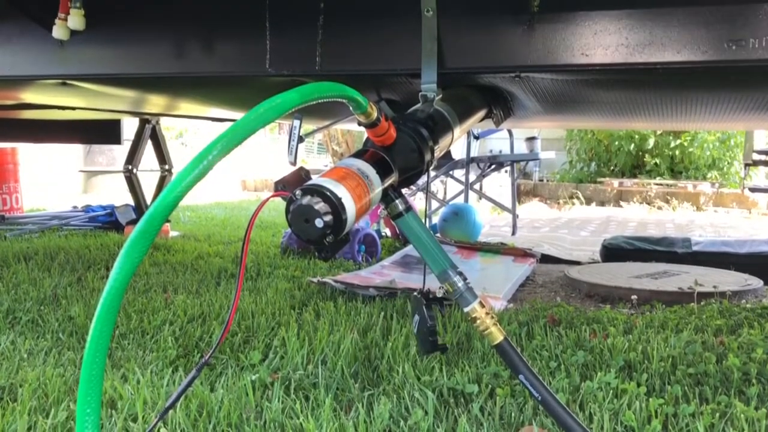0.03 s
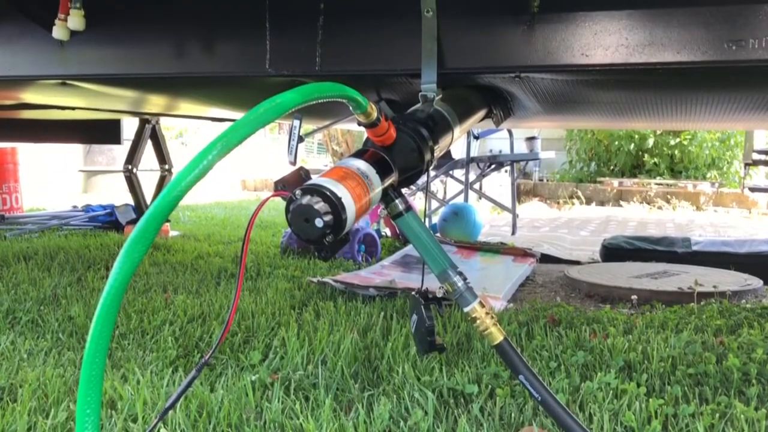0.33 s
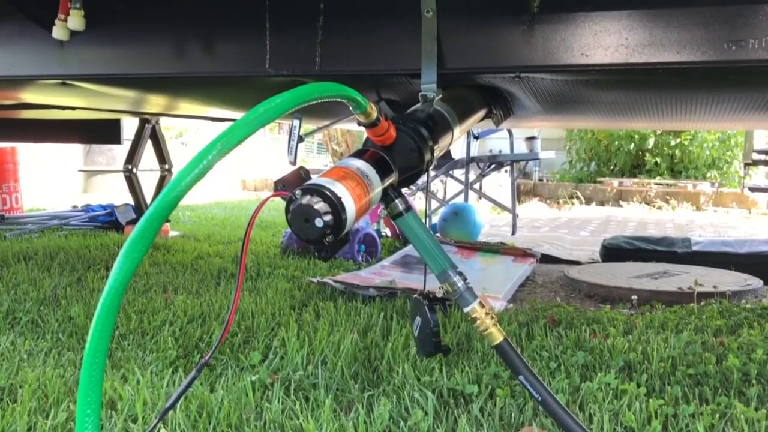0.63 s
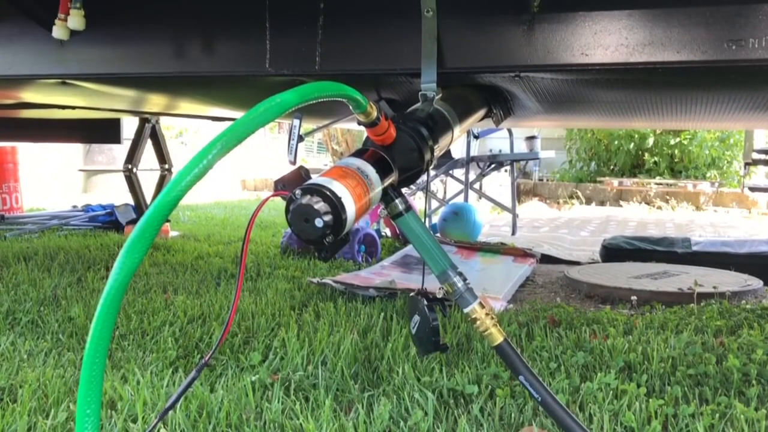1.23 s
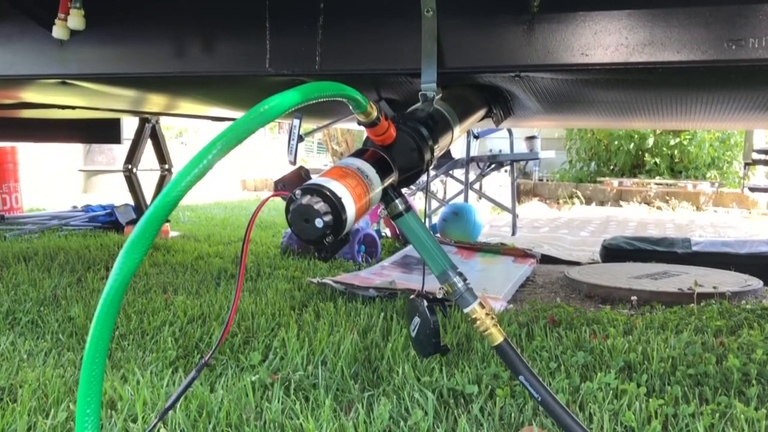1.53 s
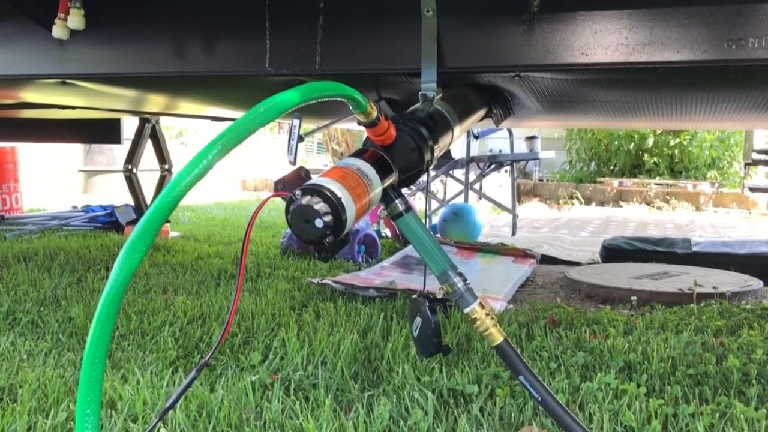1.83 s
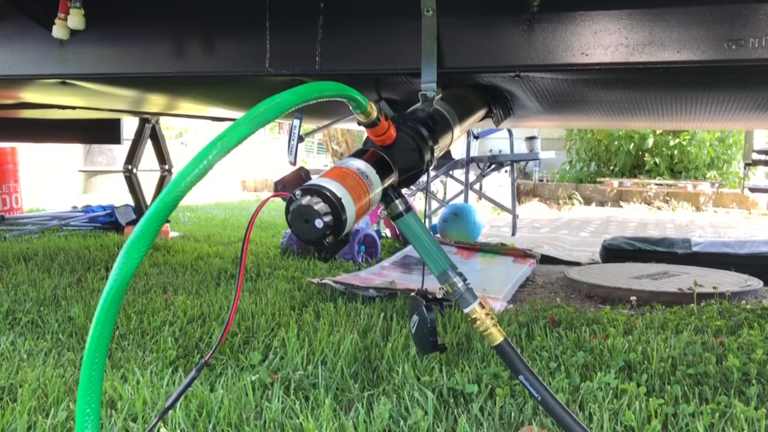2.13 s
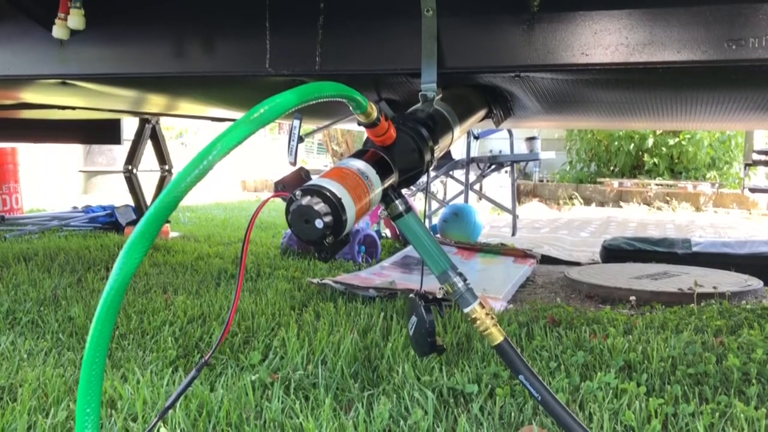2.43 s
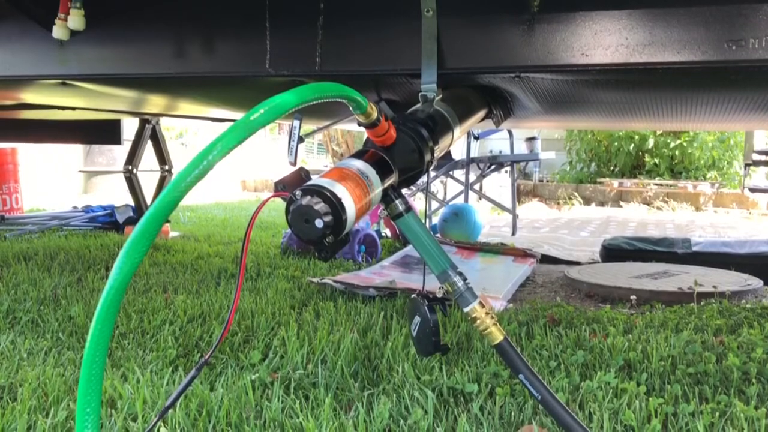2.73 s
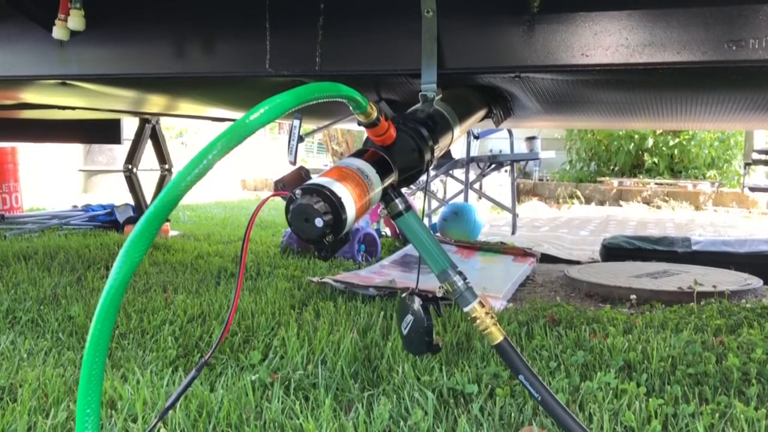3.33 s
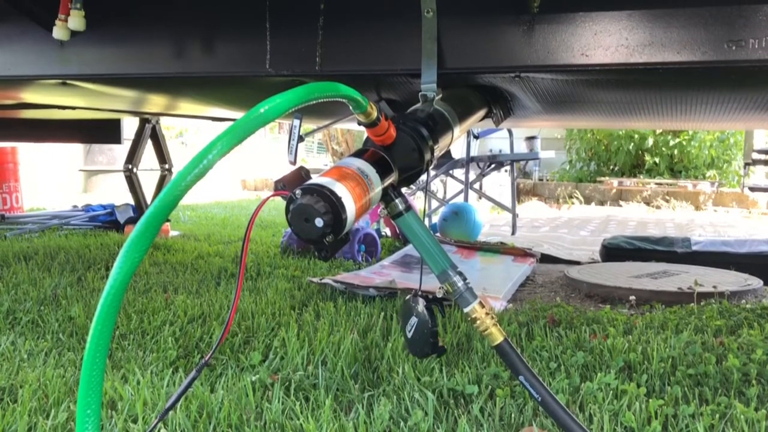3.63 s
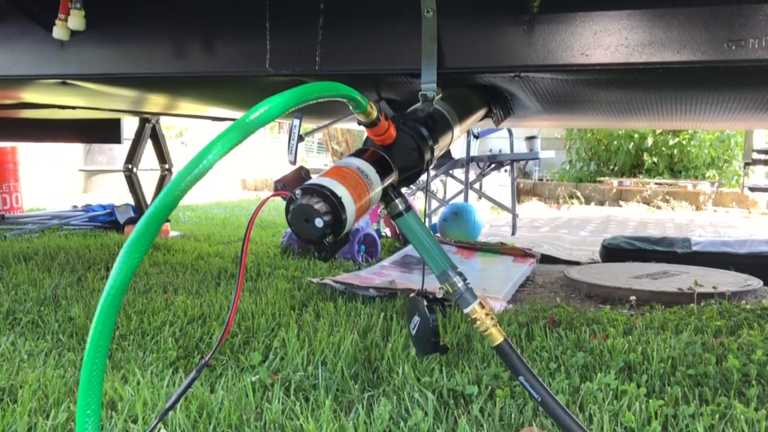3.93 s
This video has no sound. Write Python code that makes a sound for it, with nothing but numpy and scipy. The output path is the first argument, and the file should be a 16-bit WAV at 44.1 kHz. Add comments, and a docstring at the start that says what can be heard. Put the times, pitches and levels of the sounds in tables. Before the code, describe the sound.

Close up outdoors, a small electric pump hums at an even pitch, its vanes ticking rapidly while water churns in the housing. A faint rumble lies underneath, grit clicks three times, and the hum shifts slightly near the end.

```python
"""A small electric macerator pump runs steadily on a lawn, close by. From the start its six
impeller vanes hum and tick, the shaft knocks in the same pattern every turn, and water churns
through the housing and hose over a low outdoor rumble and drone. Grit clicks in the housing
near 0.8 s and 2.1 s. A soft thud at 2.7 s comes just before a last click, and around then
the load shifts and a few partials of the hum swell."""
import sys
import numpy as np
from scipy import signal
from scipy.fft import rfft, irfft, next_fast_len
from scipy.io import wavfile
from scipy.ndimage import map_coordinates

SR = 44100
rng = np.random.default_rng(int(sys.argv[2]) if len(sys.argv) > 2 else 0)


def int16_out(signal):
    """Quantize to a 16-bit WAV file."""
    q = np.round(np.clip(np.atleast_2d(signal).T, -1, 1) * 32767)
    wavfile.write(sys.argv[1], SR, q.astype(np.int16))


N = 176400

def amp(db):
    """Amplitude grows tenfold for every 20 dB."""
    return 10 ** (np.asarray(db) / 20)

def unit(x):
    """Normalisation to an rms of 1."""
    return x / np.sqrt(np.mean(x ** 2) + 1e-20)

def wobble(rate):
    """Random modulation: a smooth curve through `rate` random knots a second."""
    knots = rng.standard_normal(1024)
    return map_coordinates(knots, [np.arange(N) * rate / SR], mode="wrap")

def filtered(x, response):
    """Linear filtering multiplies the spectrum by a frequency response."""
    size = next_fast_len(N + SR // 2)
    return irfft(rfft(x, size) * response(np.fft.rfftfreq(size, 1 / SR)), size)[:N]

def coloured(x, spectrum):
    """Spectral shaping by (Hz, dB) points, falling 12 dB an octave beyond them; the rms is 1."""
    hz, db = np.transpose(spectrum)
    def response(f):
        gain = amp(np.interp(np.log(f + 1), np.log(hz), db))
        return gain * np.minimum(f / hz[0], 1) ** 2 / np.maximum(f / hz[-1], 1) ** 2
    return unit(filtered(x, response))

def ringing(force, modes):
    """Resonance: each mode passes a narrow band of the force that drives it."""
    def peak(f, hz, width):
        return (1j * f * width / (hz * hz - f * f + 1j * f * width)) ** 2
    # Squaring narrows a peak; the factor 1.55 restores its width.
    return sum(amp(db) * unit(filtered(force, lambda f: peak(f, hz, 1.55 * width)))
               for hz, width, db in modes)

def contacts(turns, pattern, decay_ms, scatter_db):
    """Impact excitation: decaying noise bursts of uneven strength at set angles of every turn."""
    angle, db = np.transpose(pattern)
    at_turn = (np.arange(180)[:, None] + angle).ravel()
    scatter = scatter_db * np.clip(rng.standard_normal(len(at_turn)), -2, 2)
    strength = amp(np.resize(db, len(at_turn)) + scatter)
    blows = np.bincount(np.searchsorted(turns, at_turn), strength, N + 1)[:N]
    envelope = signal.lfilter([1], [1, -np.exp(-1e3 / (decay_ms * SR))], blows)
    return envelope * rng.standard_normal(N)

# The shaft's speed. Each row: time in seconds, turns per second.
SHAFT_SPEED = [(0, 43.5), (.3, 43.52), (.55, 43.44), (.8, 43.52), (1.05, 43.46), (1.3, 43.52),
               (1.75, 43.43), (2.1, 43.49), (2.4, 43.56), (2.75, 43.54), (3.1, 43.6), (3.7, 43.52),
               (4, 43.52)]
def shaft_turns(t):
    """Angle, here in turns, is the integral of rotational speed."""
    return np.cumsum(np.interp(t, *np.transpose(SHAFT_SPEED))) / SR

# The knocks of one turn. Each row: angle in turns, relative level in dB.
KNOCK_PATTERN = [(0.036, -5), (.158, -1), (0.206, -6.5), (0.324, -4.5), (.38, -8.5), (0.543, -5),
                 (0.712, -6.5), (.878, 0.5), (0.918, -5), (.985, -3)]
# Their clack. Each row: frequency in Hz, relative spectral density in dB.
KNOCK_SPECTRUM = [(1800, -21), (2500, -12), (2850, -11.5), (3280, -18), (3450, 0.5), (4000, 1.5),
                  (4700, -1), (5150, -3.5), (6000, -8.5), (8000, -12), (15000, -21)]
# The casing's resonances. Each row: frequency in Hz, bandwidth in Hz, rms level in dB.
CASING_MODES = [(2652, 65, -68.5), (2843, 164, -58.5), (3435, 140, -69.5), (3900, 460, -67.5),
                (5113, 300, -72.5)]
def shaft_knocks(turns):
    """Impacts of the shaft, drifting in force, clack and excite the modes of the casing."""
    blows = contacts(turns, KNOCK_PATTERN, decay_ms=0.44, scatter_db=2) * amp(0.58 * wobble(20))
    return amp(-55.5) * coloured(blows, KNOCK_SPECTRUM) + ringing(blows, CASING_MODES)

VANES = 6
# The pump body's hum and whine. Each row: multiple of the shaft speed, level in dB re HUM_DB.
HARMONICS = [(2, -24), (3, -39), (4, -37), (5, -31), (6, -2.5), (7, -28.5), (8, -39.5), (9, -40),
             (11, -29.5), (12, -13.5), (13, -34.3), (14, -39), (15, -41.5), (16, -35), (17, -35.5),
             (18, -31.5), (19, -31.5), (20, -41), (21, -57), (22, -51), (23, -43.5), (24, -37), (25, -45.5),
             (26, -34.5), (28, -40.5), (29, -40), (30, -37), (31, -37), (32, -40.5), (33, -37.5), (34, -44),
             (35, -43.5), (36, -33), (37, -35.5), (38, -47), (39, -50), (40, -61), (41, -45.3), (42, -39.5),
             (43, -48), (44, -68), (46, -60.8), (47, -57.4), (48, -55), (49, -55), (50, -60), (51, -56),
             (54, -44), (56, -49), (57, -63), (59, -46), (60, -33.5), (61, -45), (63, -46.2), (65, -43),
             (70, -49), (71, -53), (72, -39)]
# The effect of the load shift. Each row: multiple of the shaft speed, change of level in dB.
LOAD_CHANGES = [(4, -3), (5, 7), (12, 1.8), (36, 2), (54, 3)]
HUM_DB, LOAD_SHIFT_S, LOAD_RISE_S = -29, 2.87, 0.39
def pump_hum(t, turns):
    """Periodic motion gives harmonics: the first two vane-passing tones are firm, the rest waver."""
    load = np.tanh((t - LOAD_SHIFT_S) / LOAD_RISE_S) / 2
    angle, knock_db = np.transpose(KNOCK_PATTERN)
    hum = np.zeros(N)
    for order, db in HARMONICS:
        firm = order in (VANES, 2 * VANES)
        waver_db = (0.13 if firm else 1.5) * wobble(14)
        envelope = unit(amp(waver_db + dict(LOAD_CHANGES).get(order, 0) * load))
        # The wavering harmonics take their phase from the knock pattern.
        phase = 0 if firm else np.angle(np.sum(amp(knock_db) * np.exp(-2j * np.pi * order * angle)))
        hum += amp(db) * envelope * np.sin(2 * np.pi * order * turns + phase)
    return amp(HUM_DB) * np.sqrt(2) * hum

# Each entry: relative level of one vane's tick in dB.
VANE_LEVELS = [-1, 0, .5, -1, 0, -2.5]
# The ticks and the rubbing. Each row: frequency in Hz, relative spectral density in dB.
TICK_SPECTRUM = [(3000, -17), (5500, -1), (6500, -1), (6800, 0), (7200, -1), (8200, -0.5), (9500, -5),
                 (11000, -8), (11800, -1.5), (12700, -12), (14200, -6), (14900, -5), (15700, -7)]
RUB_SPECTRUM = [(1800, -16), (2200, -7), (2800, 5.5), (3250, 3), (3900, 3.5), (5300, -2), (5900, -4.5),
                (6500, -3), (6800, -7), (7200, -7), (8300, -3.5), (9000, -13.5), (12700, -18), (14200, -4),
                (15700, -23)]
# The motor's resonances. Each row: frequency in Hz, bandwidth in Hz, rms level in dB.
MOTOR_MODES = [(7230, 200, -68), (10305, 130, -73.5), (10410, 170, -69), (14100, 250, -74)]
def impeller_vanes(turns):
    """Impact and friction: passing vanes tick over a rubbing hiss, and both ring the motor."""
    pattern = [(0.115 + k / VANES, db) for k, db in enumerate(VANE_LEVELS)]
    ticks = contacts(turns, pattern, decay_ms=0.53, scatter_db=1.7) * amp(1.4 * wobble(25.04))
    rub = rng.standard_normal(N)
    ring = ringing(unit(ticks) + amp(-7) * rub, MOTOR_MODES)
    return amp(-58) * coloured(ticks, TICK_SPECTRUM) + amp(-54.5) * coloured(rub, RUB_SPECTRUM) + ring

# The churning water. Each row: frequency in Hz, relative spectral density in dB.
WATER_SPECTRUM = [(60, 0.5), (110, -3.5), (220, 1.5), (320, -3.5), (390, -2.5), (430, -3.5), (480, 1.5),
                  (550, -10), (620, -4), (700, -1), (790, -9.5), (920, -9.5), (1050, -12), (1220, -5),
                  (1420, -14), (1620, -13.5), (1750, -15), (2100, -22.5), (3000, -28.5)]
def water():
    """Turbulence in the housing and hose makes broadband noise of nearly steady level."""
    return amp(-50 + 0.42 * wobble(29.9)) * coloured(rng.standard_normal(N), WATER_SPECTRUM)

# The outdoor rumble. Each row: frequency in Hz, relative spectral density in dB.
RUMBLE_SPECTRUM = [(20, -36), (33, -32), (44, -12), (65, -1), (90, -3), (120, -12), (300, -32)]
# The swell of rumble and drone. Each row: time in seconds, gain in dB.
BASS_ENVELOPE = [(0, -58), (.22, -50), (.39, -59), (.63, -48.5), (.77, -58), (1.0, -49), (1.2, -50),
                 (1.55, -57), (1.72, -50.5), (2.2, -54), (2.36, -62), (2.54, -53), (2.8, -58),
                 (2.94, -53.5), (3.35, -51), (3.63, -60), (3.78, -60), (3.93, -53)]
def rumble_and_drone(t, drone_hz=66.4):
    """Amplitude modulation: outdoor rumble and a wavering drone swell under one envelope."""
    rumble = amp(-4) * coloured(rng.standard_normal(N), RUMBLE_SPECTRUM)
    waver = amp(2 * wobble(2.7))
    drone = amp(-0.5) * unit(waver * np.sin(2 * np.pi * drone_hz * t + 0.6 * wobble(4.6)))
    return amp(np.interp(t, *np.transpose(BASS_ENVELOPE))) * (rumble + drone)

# Grit striking the housing. Each row: start in seconds, initial level in dB.
GRIT_HITS = [(.76, -45), (2.068, -43), (2.757, -45)]
# Its click. Each row: frequency in Hz, relative spectral density in dB.
GRIT_SPECTRUM = [(2500, -20), (3300, 2), (4200, -4), (6000, -12), (9000, -31)]
def grit(t, decay_ms=4.9):
    """Damping makes the click of each impact on the housing die away exponentially."""
    envelope = sum(amp(db) * (t >= start) * np.exp(-np.abs(t - start) * 1e3 / decay_ms)
                   for start, db in GRIT_HITS)
    return envelope * coloured(rng.standard_normal(N), GRIT_SPECTRUM)

def thud(t, peak_s=2.672, hz=150, half_width_ms=4):
    """A Gaussian pulse of a low tone, too brief to carry a pitch, is heard as a soft thud."""
    since = t - peak_s
    return amp(-35) * np.exp(-(since * 1e3 / half_width_ms) ** 2) * np.cos(2 * np.pi * hz * since)

def scene():
    """Superposition: the sources add, with one shaft keeping knocks, hum and ticks in step."""
    t = np.arange(N) / SR
    turns = shaft_turns(t)
    pump = shaft_knocks(turns) + pump_hum(t, turns) + impeller_vanes(turns)
    return (pump + water() + rumble_and_drone(t) + grit(t) + thud(t))[None]

CUTOFF_HZ = 15750
def record(dry):
    """Band limiting: an ideal low-pass filter removes the highest treble."""
    return filtered(dry[0], lambda hz: hz < CUTOFF_HZ)[None]

dry = scene()
out = record(dry)
int16_out(out)
```